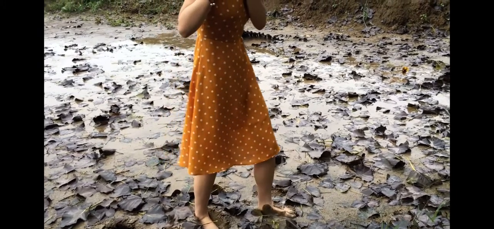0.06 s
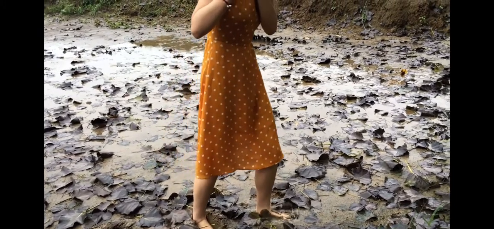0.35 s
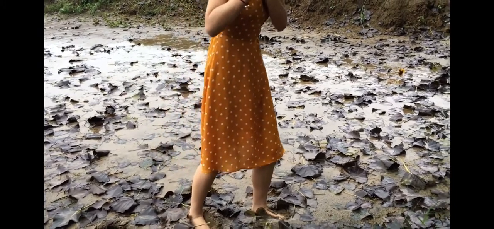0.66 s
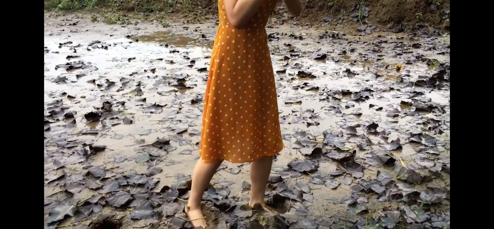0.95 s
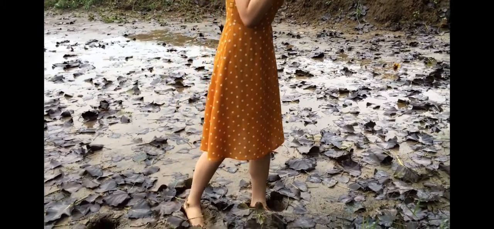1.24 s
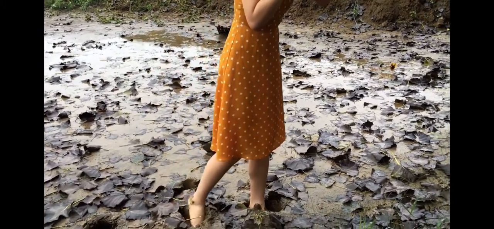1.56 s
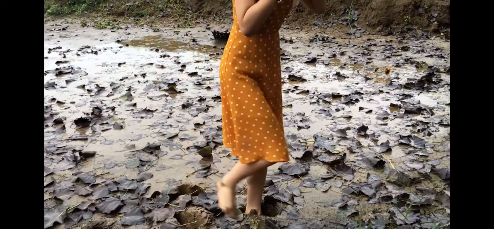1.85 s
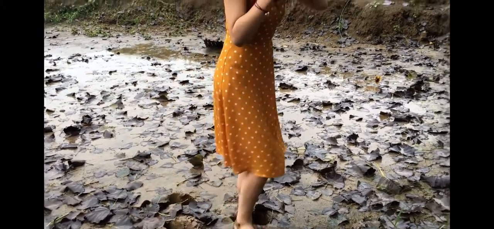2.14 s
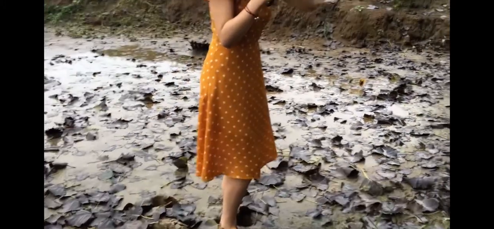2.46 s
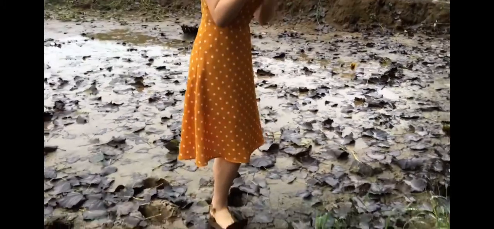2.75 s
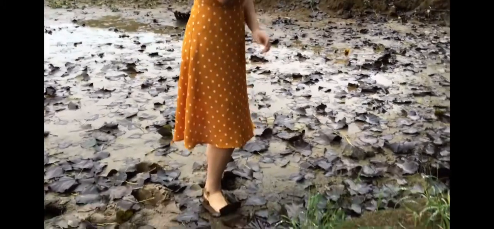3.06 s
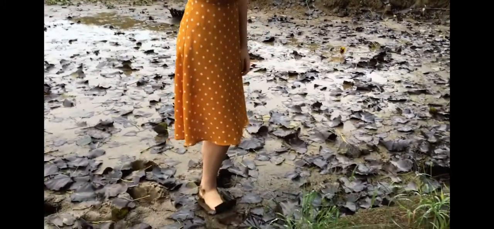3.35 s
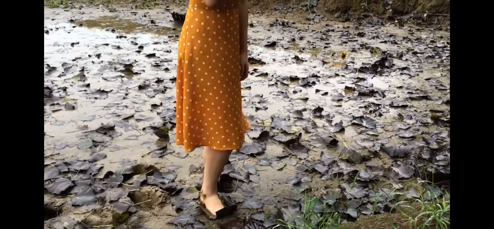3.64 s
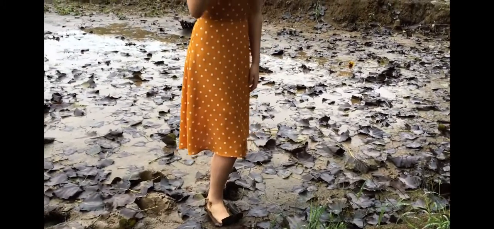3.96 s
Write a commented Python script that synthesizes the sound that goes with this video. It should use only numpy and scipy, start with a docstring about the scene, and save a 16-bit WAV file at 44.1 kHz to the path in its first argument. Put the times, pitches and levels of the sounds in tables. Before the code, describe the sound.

Faint squelching steps in wet mud, with a small bird chirping near the end.

```python
"""Outdoors, on wet, leaf-strewn mud, someone shifts their feet. Air pockets pop as damped resonators,
films of water tick, leaves crackle, weight lands in soft thuds, and one sole peels free in a fizz of
tiny bubbles. Near the end a small bird whistles a run of falling chirps. Under it all lie steady
hiss and a low hum like a distant engine."""
import sys
import numpy as np
from scipy import signal
from scipy.fft import rfft, irfft
from scipy.io import wavfile
from scipy.ndimage import uniform_filter1d

SR = 44100
rng = np.random.default_rng(int(sys.argv[2]) if len(sys.argv) > 2 else 0)


def store_wav(level_fs):
    """Save 16-bit WAV to argv[1]."""
    pcm = np.round(np.clip(np.atleast_2d(level_fs), -1, 1) * 32767)
    wavfile.write(sys.argv[1], SR, pcm.T.astype(np.int16))


N = 176400
T = np.arange(N) / SR


def undb(db):
    """Amplitude grows tenfold for every 20 dB."""
    return 10 ** (np.asarray(db) / 20)

def unit(x):
    """Normalisation to an rms of 1."""
    return x / np.sqrt(np.mean(x ** 2))

def contour(points):
    """Linear interpolation of (time, value) points over the scene."""
    return np.interp(T, *np.array(points).T)

def colour(x, spectrum):
    """Spectral shaping by a (Hz, dB) curve, normalised to an rms of 1."""
    hz, db = np.array(spectrum).T
    f = np.maximum(np.fft.rfftfreq(N, 1 / SR), 1)
    gain = undb(np.interp(np.log(f), np.log(hz), db))
    return unit(irfft(rfft(x) * gain, N))

def wander(per_s):
    """Smoothed random steps give a slow fluctuation with a spread near 1."""
    k = int(SR / per_s)
    steps = np.repeat(rng.standard_normal(256), k)[k:N + 3 * k]
    return np.sqrt(2) * uniform_filter1d(uniform_filter1d(steps, k), k)[k:N + k]

def impulses(per_s):
    """A Poisson process: independent impulses of random sign."""
    return (rng.random(N) < per_s / SR) * rng.choice([-1, 1], N)

def ring(hz, swell_s):
    """A heavily damped resonance peaks at swell_s and dies away quickly."""
    t = T[:SR // 20]
    return t / swell_s * np.exp(1 - t / swell_s) * -np.sin(2 * np.pi * hz * t)

def scatter(x, decay_s, wet_db):
    """Diffuse reflection adds a tail: convolution with decaying noise."""
    t = T[:SR // 4]
    tail = rng.standard_normal(len(t)) * np.exp(-t / decay_s) * (1 - np.exp(-2 * t / decay_s))
    return x + undb(wet_db) * signal.fftconvolve(x, tail / np.linalg.norm(tail))[:N]

def tone(hz, drift=0.01454):
    """Slow frequency modulation makes a sine of rms 1 drift in pitch."""
    drifting_hz = hz * (1 + drift * wander(5.7))
    return np.sqrt(2) * np.sin(2 * np.pi * np.cumsum(drifting_hz) / SR)


# The strongest low tone. Each row: time in seconds, level in dB.
DRONE_LEVELS = [(0, -42), (.7, -39.5), (1.2, -41), (1.43, -47), (1.73, -34), (2.1, -45), (2.45, -41),
                (3.3, -43.5), (3.5, -33), (3.7, -48.5), (3.9, -37)]
# Two weaker tones. Each row: frequency in Hz, level in dB, waver in dB.
SIDE_TONES = [(35.1, -47.5, 1.5), (71.97, -49.5, 2.5)]
# The rumble's swell. Each row: time in seconds, level in dB.
RUMBLE_LEVELS = [(0, -45.5), (.95, -44), (1.75, -46), (2.7, -39.5), (3.15, -43), (3.55, -40), (4, -40)]
# The rumble's spectrum. Each row: frequency in Hz, relative density in dB.
RUMBLE_SPECTRUM = [(6, -42), (20, -41), (29, -2), (42, -4.5), (57, 4.5), (72, -8), (90, -7), (125, -20),
                   (200, -31), (400, -68)]

def hum():
    """Superposition of three wavering low tones and a rumble, like a distant engine."""
    drone = undb(contour(DRONE_LEVELS)) * tone(hz=50.26)
    sides = sum(undb(db + waver_db * wander(3.84)) * tone(hz) for hz, db, waver_db in SIDE_TONES)
    rumble = undb(contour(RUMBLE_LEVELS)) * colour(rng.standard_normal(N), RUMBLE_SPECTRUM)
    return drone + sides + rumble


# The outdoor hiss. Each row: time in seconds, level in dB.
HISS_LEVELS = [(0, -53), (1.0, -53), (2.0, -53.5), (2.28, -52), (2.5, -53), (3.2, -53), (4, -53)]
# Spectra of the hiss and a far-off rumble. Each row: frequency in Hz, relative density in dB.
HISS_SPECTRUM = [(180, 3.5), (300, 0.5), (470, -3), (660, 0.5), (780, -1), (930, 2), (1650, 1.5), (1920, 4),
                 (2200, 0.4), (3200, -1.5), (3550, -2.5), (4000, -3), (4600, -5), (4950, -9.5), (5250, -7),
                 (6100, -9), (6650, -7.5), (7650, -14), (9100, -12), (9950, -14), (10400, -18),
                 (11000, -13.5), (12300, -14), (14000, -17), (15500, -17)]
FAR_SPECTRUM = [(50, -13), (100, 3), (150, 1), (200, -3.5), (260, -4.5), (330, -18.5), (500, -48)]

def air():
    """Ambient noise has a continuous spectrum: smooth hiss above a steady, far-off rumble."""
    hiss_db = contour(HISS_LEVELS) + .5 * wander(8.58)
    hiss = undb(hiss_db) * colour(rng.standard_normal(N), HISS_SPECTRUM)
    return hiss + undb(-58) * colour(rng.standard_normal(N), FAR_SPECTRUM)


# The crackle's spectrum. Each row: frequency in Hz, relative density in dB.
CRACKLE_SPECTRUM = [(1500, -24), (5000, -6), (9000, -14), (16000, -22)]

def crackle(level_db=-69.5, range_db=28, rest_s=2.9, settle_s=0.49):
    """Wet leaves and films underfoot emit shot noise, which decays once the feet rest."""
    grains = impulses(per_s=110) * undb(-range_db * rng.random(N))
    snaps = scatter(grains, decay_s=0.0013, wet_db=4.0)
    movement = np.exp(-np.maximum(T - rest_s, 0) / settle_s)
    return undb(level_db) * movement * colour(snaps, CRACKLE_SPECTRUM)


def seep(per_s=30, low_hz=834, high_hz=5640, faintest_db=-81, range_db=28, swell_cycles=0.79):
    """Stray bubbles in the settling mud each ring faintly at their own natural frequency."""
    out = np.zeros(N)
    for when, pitch, strength in rng.random((400, 3))[:int(per_s * N / SR)]:
        hz = low_hz * (high_hz / low_hz) ** pitch
        add(out, when * N / SR, undb(faintest_db + range_db * strength) * ring(hz, swell_cycles / hz))
    return out

def add(out, at_s, sound):
    """Linear superposition: a short sound joins the mix at a given time."""
    i = max(int(at_s * SR), 0)
    out[i:i + len(sound)] += sound[:len(out) - i]


# Bursting air pockets. Each row: start in seconds, pitch in Hz, level in dB, rise time in ms.
AIR_POCKETS = [(.0532, 2010, -38, 0.6), (.054, 4000, -35, 0.24), (.411, 910, -48, 1.2),
               (.498, 7750, -37, .25), (.5085, 3200, -45, 0.56), (0.5094, 1170, -44.5, 1.2),
               (.538, 4830, -25.5, 0.24), (0.5394, 3960, -26.5, 0.39), (0.537, 2890, -39.5, 1.6),
               (0.5596, 5470, -27.5, 0.42), (0.559, 6480, -29.5, 0.35), (.559, 940, -42.5, 1.04),
               (.692, 1260, -40, 0.51), (0.976, 1280, -35.5, 0.43), (1.1493, 1270, -39, 0.53),
               (1.145, 3160, -40.5, 0.15), (1.547, 1400, -35.5, 0.43), (1.547, 2780, -33, 0.15),
               (1.6203, 1080, -40, 1), (1.6902, 1710, -39, 0.8), (1.691, 3080, -33.5, 0.42),
               (1.8, 1500, -35, 0.43), (2.001, 1390, -42, 0.4), (2.0707, 5570, -32, 0.4),
               (2.071, 3000, -38, .4), (2.0919, 2800, -34.5, 0.23), (2.195, 3480, -31.5, 0.3),
               (2.269, 2360, -37.5, 0.54), (2.652, 1140, -41.5, 0.66), (2.7897, 5470, -37, 0.27),
               (2.814, 1470, -44, .8), (2.8415, 1920, -41.5, 0.82)]

def pops(upper_ratio=1.286, upper_db=-10, spray_db=-22):
    """Cavity resonance: each bursting pocket rings in two modes and throws a little spray."""
    out, t = np.zeros(N), T[:SR // 20]
    for at, hz, db, rise_ms in AIR_POCKETS:
        swell_s = rise_ms / 1000
        modes = ring(hz, swell_s) + undb(upper_db) * ring(hz * upper_ratio, swell_s)
        spray = rng.standard_normal(len(t)) * np.exp(-t / (2 * swell_s))
        add(out, at, undb(db) * (modes + undb(spray_db) * spray))
    return out


# Snapping water films. Each row: start in seconds, band centre in Hz, level in dB, decay time in ms.
WATER_FILMS = [(0.4699, 15000, -34, 0.51), (.4814, 13500, -42, .7), (0.4872, 8500, -46, 1.2),
               (.5084, 9500, -43, 2.0), (0.509, 3600, -39, 2.7), (0.5128, 7900, -43, 0.53),
               (.5383, 3970, -36, 1), (.5594, 12500, -49, 0.69), (.5855, 7000, -50.5, 2.0),
               (.666, 7800, -51.5, 2.5), (0.93, 7400, -45, 2.0), (.935, 12000, -52, 3.0),
               (1.017, 11000, -49.5, 3.3), (1.118, 11200, -47, 0.92), (1.621, 2100, -45, 1.8),
               (1.8572, 11000, -46, .8), (2.0855, 8500, -34.5, 1.0), (2.155, 5960, -48, 2.0),
               (2.1945, 7500, -46, 2.2), (2.273, 5000, -48, 3), (2.4147, 14000, -49, 0.92),
               (2.597, 15000, -47, 2.0), (2.5055, 12000, -53, 1.1), (2.7896, 3000, -40.5, 2.1),
               (2.8412, 2300, -44, 2)]

def ticks(half_width_oct=0.49):
    """A brief transient has a broad spectrum: each film ruptures in a bright crack of noise."""
    out, t = np.zeros(N), T[:SR // 20]
    f = np.maximum(np.fft.rfftfreq(len(t), 1 / SR), 1)
    for at, hz, db, decay_ms in WATER_FILMS:
        band = 1 / (1 + (np.log2(f / hz) / half_width_oct) ** 2)
        crack = irfft(rfft(rng.standard_normal(len(t))) * band, len(t))
        add(out, at, undb(db) * unit(crack) * np.exp(-1000 * t / decay_ms))
    return out


# Soft footfalls. Each row: start in seconds, pitch in Hz, level in dB, rise time in seconds.
FOOTFALLS = [(0.875, 165, -34, .0016), (1.147, 313, -48, 0.0011), (2.6142, 204, -35.5, 0.0017),
             (2.628, 211, -44, .0016), (2.676, 214, -39.5, 0.0017), (2.84, 202, -43, 0.0013),
             (3.463, 177, -37, 0.0013), (3.595, 190, -40.5, 0.0012)]

def thuds():
    """Impact on soft ground excites a low, heavily damped vibration."""
    out = np.zeros(N)
    for at, hz, db, swell_s in FOOTFALLS:
        add(out, at, undb(db) * ring(hz, swell_s))
    return out


# Mud peeling from the sole. Each row: start, attack, hold and release in seconds, level in dB.
PEELS = [(2.057, 0.021, 0.024, 0.02, -42.5), (2.126, 0.021, 0.04, 0.015, -46.5)]
# The fizz's spectrum. Each row: frequency in Hz, relative density in dB.
FIZZ_SPECTRUM = [(700, -9), (1000, -8), (2400, -1), (3800, -2.5), (4800, -12), (5800, -4.5), (7500, -11.5),
                 (12000, -12.5), (16000, -19)]

def squelch(lag_s_per_oct=0.0086, on_time_hz=10900, spread_db=2.5):
    """Larger bubbles resonate lower; they burst later as the sole peels off, so the fizz darkens."""
    out = np.zeros(N)
    fizz_hz, fizz_db = np.array(FIZZ_SPECTRUM).T
    for hz in 700 * 2 ** (np.arange(10) / 2):  # half-octave bands
        bursts = impulses(per_s=1800) * undb(spread_db * rng.exponential(size=N))
        band = signal.butter(2, [hz / 2 ** .25, hz * 2 ** .25], "band", fs=SR, output="sos")
        t = T - lag_s_per_oct * np.log2(on_time_hz / hz)
        pull = np.zeros(N)
        for at, attack, hold, release, db in PEELS:
            rise = np.clip((t - at) / attack, 0, 1)
            fall = np.exp(-np.maximum(t - at - attack - hold, 0) / release)
            pull += undb(db) * rise * fall
        weight = 2 * undb(np.interp(np.log(hz), np.log(fizz_hz), fizz_db))
        out += weight * pull * signal.sosfilt(band, unit(bursts))
    return out


# The bird's chirps. Each row: centre in seconds, level in dB, crest pitch in Hz,
# time from crest to centre in seconds, limiting rate of fall in Hz per second.
BIRD_CHIRPS = [(3.502, -56, 4100, .011, 22100), (3.572, -49, 4220, .012, 27000),
               (3.645, -43.5, 4220, 0.012, 34100), (3.7125, -41.5, 4210, 0.0089, 38500),
               (3.781, -42.5, 4220, .014, 31800), (3.848, -41, 4270, 0.014, 36500),
               (3.914, -41, 4210, .0115, 35000), (3.981, -41.5, 4210, 0.014, 30000)]

def bird(half_span_s=0.044, arch_s=0.01144, swell_s=0.013, waver_hz=10, flutter_depth=0.13):
    """Frequency modulation: each whistle arches over a crest and slides down, echoed by the bank."""
    out = np.zeros(N)
    t = T[:int(2 * half_span_s * SR)] - half_span_s
    for at, db, crest_hz, lead_s, fall_rate in BIRD_CHIRPS:
        flutter = unit(uniform_filter1d(rng.standard_normal(len(t)), size=150))
        waver = unit(uniform_filter1d(rng.standard_normal(len(t)), size=150))
        arch_hz = crest_hz - fall_rate * (np.hypot(t + lead_s, arch_s) - arch_s)
        phase = 2 * np.pi * np.cumsum(arch_hz + waver_hz * waver) / SR
        swell = (1 + flutter_depth * flutter) * np.exp(-(t / swell_s) ** 2)
        add(out, at - half_span_s, undb(db) * swell * np.sin(phase))
    return scatter(out, decay_s=0.0099, wet_db=-17)


# Reflections off nearby surfaces. Each row: delay in seconds, relative level in dB.
REFLECTIONS = [(.0034, -14), (.0094, -15)]

def ground(x):
    """Early reflection: two delayed copies join the sound, and the wet ground scatters all three."""
    echoes = sum(undb(db) * np.pad(x, (int(delay * SR), 0))[:N] for delay, db in REFLECTIONS)
    return scatter(x + echoes, decay_s=.004, wet_db=-14)


def scene():
    """Sound pressures add: feet in the mud, bird and background sum to one channel."""
    mud = ground(pops() + ticks() + seep()) + squelch() + crackle() + thuds()
    return (mud + bird() + hum() + air())[None]

def record(dry, cutoff_hz=15850):
    """A steep low-pass filter removes the highest treble."""
    return signal.sosfilt(signal.ellip(10, .2, 80, cutoff_hz, fs=SR, output="sos"), dry)


dry = scene()
out = record(dry)
store_wav(out)
```